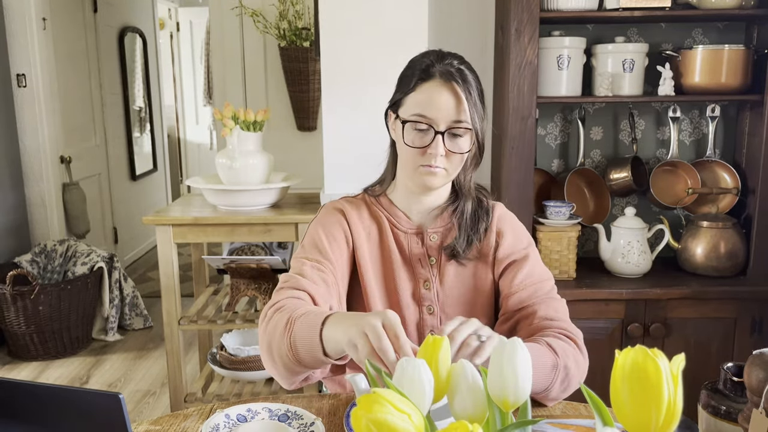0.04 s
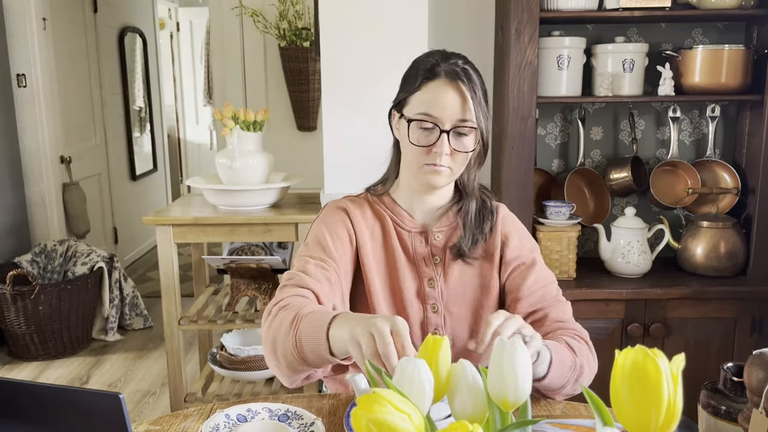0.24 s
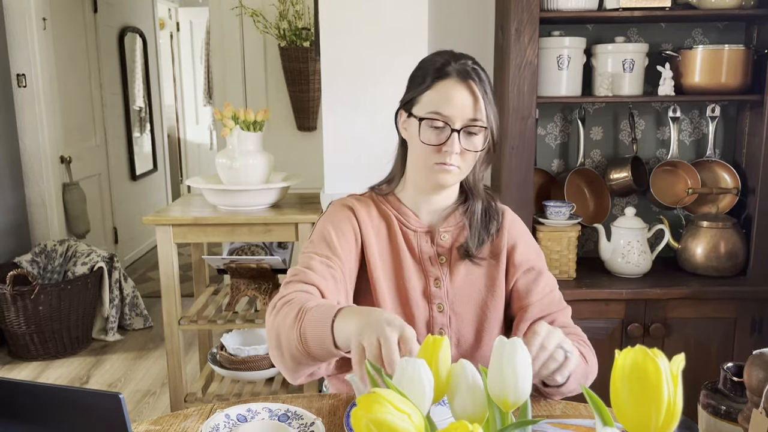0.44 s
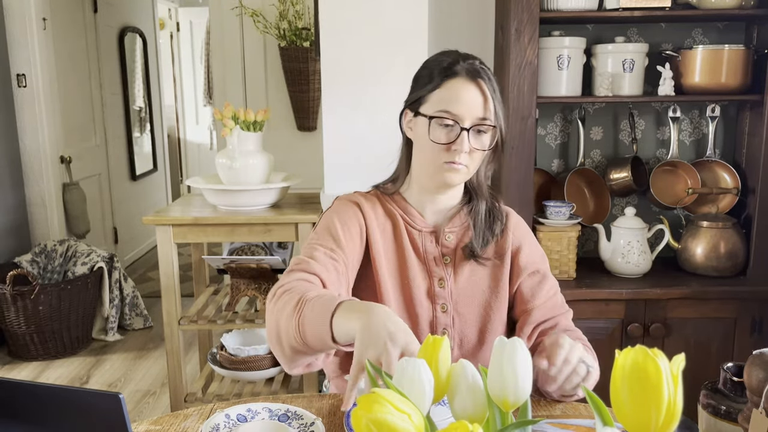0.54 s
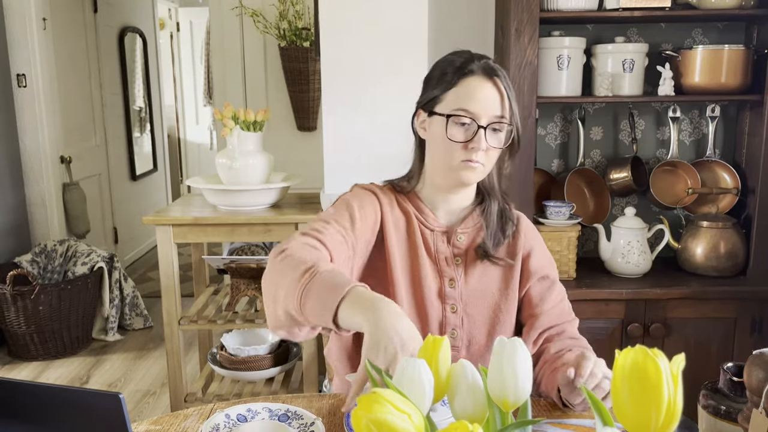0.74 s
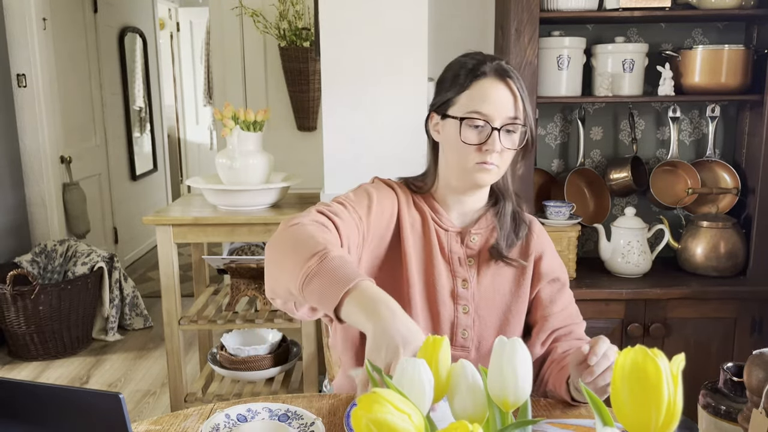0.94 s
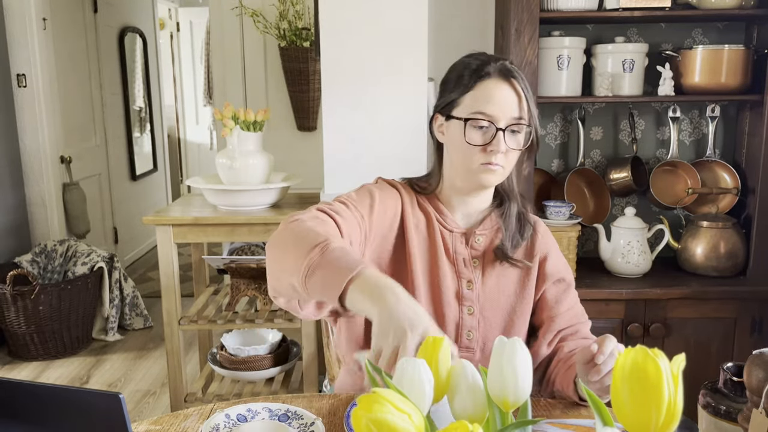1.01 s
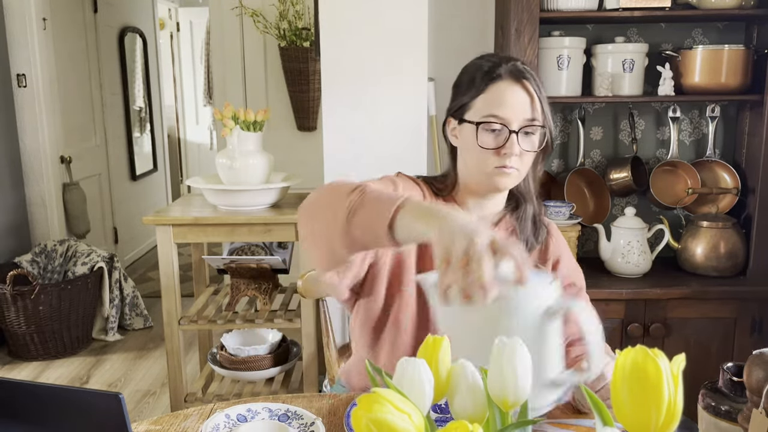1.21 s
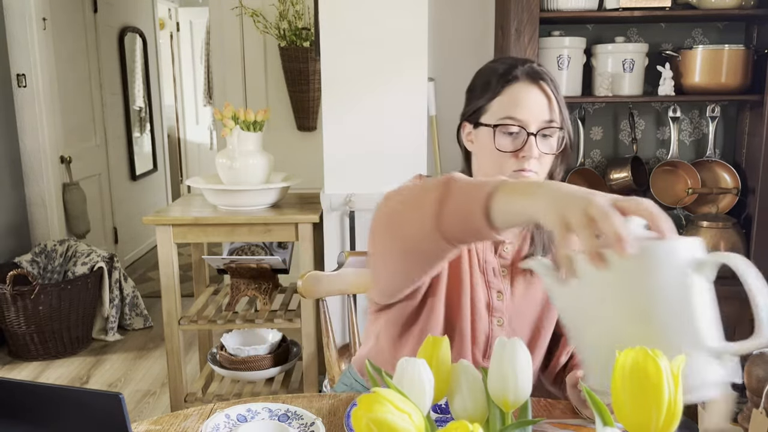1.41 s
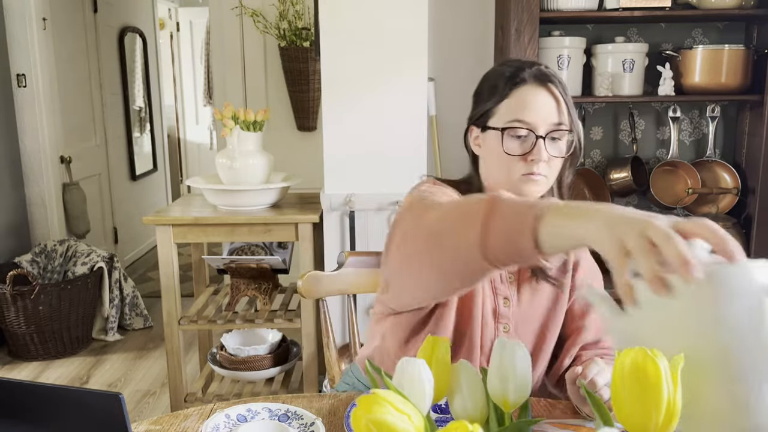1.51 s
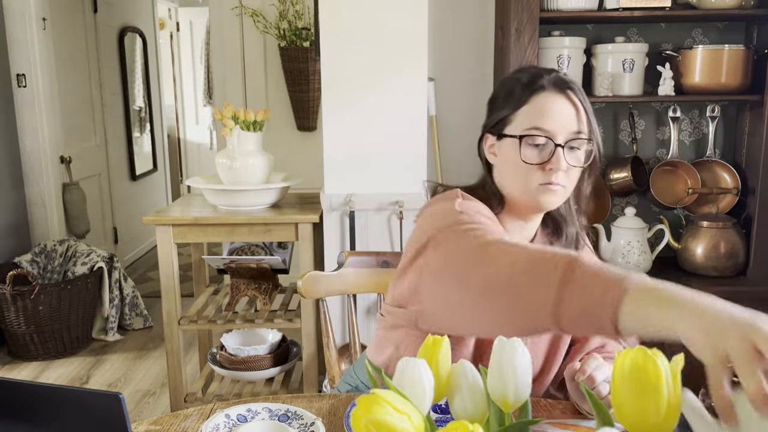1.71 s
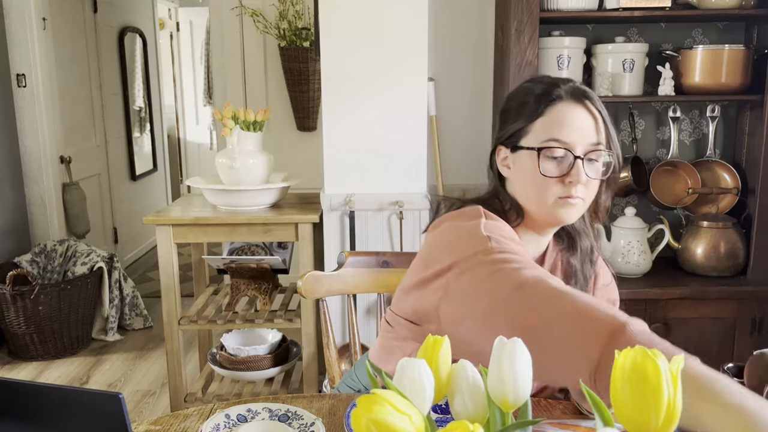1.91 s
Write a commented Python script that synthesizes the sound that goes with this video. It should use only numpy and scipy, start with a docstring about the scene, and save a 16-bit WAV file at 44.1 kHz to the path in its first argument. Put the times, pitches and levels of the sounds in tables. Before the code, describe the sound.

A china lid touches a teapot at about 0.2 seconds, then clinks and rattles into its seat by 0.4, ringing briefly and thumping the wooden table. From 0.7 to 1 second a kettle is picked up with much softer knocks, and a few fainter ones follow until 1.6. A sleeve faintly swishes and an arm lightly bumps the table, up to about 1.9 seconds, in a small quiet room.

```python
"""Teapot lid and kettle

In a small quiet room, a china lid touches a teapot, clinks on the rim and rattles into its seat.
Each contact makes the china ring and thumps the wooden table. Then a kettle is picked up with a few
soft knocks and lifted aside, while a sleeve swishes and an arm bumps the table."""
import sys
import numpy as np
from scipy import signal
from scipy.fft import rfft, irfft
from scipy.io import wavfile

SR = 44100
rng = np.random.default_rng(int(sys.argv[2]) if len(sys.argv) > 2 else 0)


def digitize_waveform(pressure):
    """Quantize a signal to 16-bit integers and store it at the path in sys.argv[1].

    Rows of a 2-D input are taken as channels; values are limited to [-1, 1].
    """
    field = np.atleast_2d(pressure).T
    bounded = np.clip(field, -1, 1)
    quanta = np.round(bounded * 32767).astype(np.int16)
    wavfile.write(sys.argv[1], SR, quanta)


N = 85995
RING_T = np.arange(int(.6 * SR)) / SR  # time since a hit, in seconds

# The lid meets the pot (t/s, then level/dB of pot, rim, lid, crack and table, brightness/Hz, rise/s)
CLINKS = [(0.1777, -22, -46, -54, -27, -50, 2611, .0025),
          (0.2208, -19.5, -21.5, -27, -23, -58, 3000, 0.00045),
          (0.2329, -22, -21.5, -23.5, -23.5, -49.5, 5550, 0.00084),
          (0.3120, -45, -19.5, -20.5, -21.5, -44.5, 7006, .0003),
          (0.3200, -18, -43.5, -24.5, -19, -22, 4000, 0.0012),
          (0.3307, -27, -45, -18, -24.5, -29.5, 6956, .001),
          (0.3579, -27.5, -19.5, -36.5, -33.5, -37.5, 6000, .0006),
          (0.3640, -24.5, -41.5, -12, -20, -38, 14960, 0.00027),
          (0.3705, -31, -26, -24.5, -24, -30, 7996, .001),
          (0.3880, -25, -34.5, -16.5, -24.5, -31.5, 7000, 0.0006)]
# Modes are the tones a struck thing rings with (f/Hz, level/dB, time to fade by 60 dB/s)
POT_MODES = [(334, -6, .2), (385, -9, .07), (505, -9, .14), (570, -11, .06), (982, -8, .38),
             (1199, -12, .3), (1214, -4, .32), (1395, -13, .24), (1740, -16, .1), (2161, -14, .36),
             (2966, -8, .34), (3801, -18, .38), (4357, -14, .32), (4735, -19, .3), (5012, -16, .25)]
RIM_MODES = [(1230, -8, .34), (1830, -13, .2), (2586, -5, .4), (2606, -8, .14), (2790, -13, .16),
             (2940, -18, .3), (3110, -3, .22), (3343, -12, .2), (3800, -11, .36), (4640, -15, .24),
             (4810, -19, .2), (5368, -18, .14)]
LID_MODES = [(1098, -12, .33), (2865, -5.5, .29), (2978, -14, .28), (3133, -3, .23), (3216, -9, .29),
             (3290, -16, .18), (4039, -15, .33), (4527, -21, .25), (4736, -13, .33), (6434, -26, .25),
             (7156, -26, .12), (7520, -21, .16), (7646, -12, .18), (7840, -22, .15)]
TABLE_MODES = [(124, -14.5, .15), (160, -3.5, 0.13), (190.6, -1.5, 0.15), (222.8, 0.5, .17),
               (315, -6.5, 0.056), (423, -5, .07), (505.5, -4, .15), (655, -12.5, 0.3)]
# Strength of the china's many weak high tones (f/Hz, level/dB)
OVERTONES = [(5400, -2.5), (6000, -9), (7700, -6.5), (8800, -11), (10000, -2.5), (11300, 0), (12600, -4),
             (14200, -6.5), (15200, -13.5)]
# Kettle knocks (t/s, ring level/dB, main ring f/Hz, thud level/dB, brightness/Hz)
KNOCKS = [(0.736, -63.5, 1059, -47, 809), (0.878, -48, 1051, -46, 879), (0.892, -61, 1050, -45.5, 1200),
          (0.917, -57.5, 1250, -47.5, 1490), (0.944, -71, 1233, -57, 1500), (0.981, -66, 1260, -50, 804),
          (1.0058, -48.5, 1250, -48, 3660), (1.362, -67.5, 1039, -56.5, 2500), (1.533, -84, 1060, -51, 693),
          (1.634, -74, 900, -56, 1000)]
# The kettle's modes (multiple of the main ring, level/dB, time to fade by 60 dB/s)
KETTLE_MODES = [(1, -2.5, .16), (1.04, -7, .1), (1.35, -4, .11), (1.41, -3, .11), (1.48, -3, .14),
                (1.56, -6, .11), (2.1, -14, .1), (2.3, -12, .12), (2.6, -14, .1), (3.03, -11, .1)]
# The arm bumps the table (t/s, level/dB, f/Hz)
BUMPS = [(0.609, -46.5, 116.4), (0.70, -49.5, 65.11), (0.991, -42, 91), (1.079, -52.5, 109.7),
         (1.538, -51, 119.5), (1.696, -52.5, 121), (1.738, -49.5, 83), (1.765, -57.5, 117.6)]
# How the sleeve's swish and the arm's low rustle swell and fade (t/s, level/dB)
SLEEVE_LEVEL = [(0, -101), (0.12, -79.5), (0.8, -91), (0.95, -75.5), (1.15, -85), (1.25, -80), (1.29, -73),
                (1.33, -76.5), (1.37, -71.5), (1.44, -79), (1.58, -77.5), (1.68, -66), (1.78, -67),
                (1.87, -70), (1.95, -69.5)]
RUSTLE_LEVEL = [(0, -64.5), (0.12, -77), (0.6, -70.5), (0.82, -75.5), (0.95, -59), (1.2, -77), (1.38, -71),
                (1.47, -73.5), (1.6, -65.5), (1.7, -65.5), (1.8, -71.5), (1.95, -74)]
# A spectrum says how strong a noise is from low to high (f/Hz, relative level/dB)
CRACK_SPECTRUM = [(110, -22.5), (190, -7), (330, -3.5), (520, 0), (760, -6), (1150, 3), (1800, -2),
                  (2300, -6), (3000, 5.5), (3600, -5.5), (5000, -1.5), (6000, -15.5), (7700, -12.5),
                  (8800, -25), (11000, -15), (14000, -16), (16000, -35)]  # quickly dying part of a clink
CLACK_SPECTRUM = [(700, -18), (1250, 1), (1450, -8), (1800, -2), (2200, -23), (2800, -12), (3400, -23),
                  (3850, -13), (4600, -33), (9000, -45)]  # dry part of a knock
THUD_SPECTRUM = [(40, -6.5), (100, 6), (230, -2.5), (500, -7), (800, -15), (1800, -28), (4000, -31),
                 (9000, -38)]  # dull part of a knock
SLEEVE_SPECTRUM = [(530, -24), (900, 1.5), (1240, -14), (1750, -2.5), (3630, -4.5), (4180, -2), (7320, -14),
                   (8340, -34), (9180, -21), (13100, -14), (15500, -26)]
RUSTLE_SPECTRUM = [(60, -17), (130, 2), (300, 0), (600, -7.5), (1000, -14), (2000, -25), (5000, -44)]
HUSH_SPECTRUM = [(12, -33.5), (20, -3.5), (80, 7), (259, -19), (491, -27.5), (581, -40.5), (811, -27),
                 (1630, -39), (2210, -34), (3450, -47.5), (4430, -36), (7730, -44.5), (12400, -39.5),
                 (15500, -61)]  # the quiet room
# How long the room echoes (f/Hz, time to fade by 60 dB/s)
ROOM_FADE = [(100, .55), (320, .38), (900, .36), (2500, .31), (6000, .25), (13000, .23)]
# How alike left and right are (f/Hz, likeness: 1 is the same, 0 is unrelated)
LIKENESS = [(50, .96), (220, 0.9), (500, .4), (1200, .4), (2800, .7), (5000, .3), (8000, -.3), (13000, 0.4)]
# How much louder the teapot is on the left (f/Hz, left minus right level/dB)
TEAPOT_LEAN = [(100, -0.3), (300, 0), (1200, 1), (3100, 2.2), (3800, 5), (4500, 10), (5400, 5.5),
               (7000, 0.5), (14000, .3)]
# How far a tone is out of step between left and right (f/Hz, phase/rad)
PHASE_GAP = [(100, 0.12), (330, 0.75), (520, 0.94), (1200, 1.5), (2900, 1), (4500, 0.7), (7600, 2.0),
             (12000, 1.5)]


def teapot():
    """Each contact rings pot, rim and lid, gives a short crack of noise and thumps the table."""
    seated_s, damping_db_per_s = 0.37, 45
    rings, cracks, thumps = np.zeros((3, 2, N))
    shimmer = overtones(count=44)
    shimmer_hz = np.mean([hz for hz, db in OVERTONES])
    thump = ring(TABLE_MODES, bright_hz=np.inf, rise_s=.003)
    for s, pot_db, rim_db, lid_db, crack_db, table_db, bright_hz, rise_s in CLINKS:
        for modes, db in (POT_MODES, pot_db), (RIM_MODES, rim_db), (LID_MODES, lid_db):
            add(rings, s, amp(db) * ring(modes, bright_hz, rise_s))
        shimmer_gain = amp(crack_db - 18.5) * contact(shimmer_hz, bright_hz)
        add(rings, s, shimmer_gain * dying(fade_s=.14, rise_s=rise_s) * shimmer)
        crack = noise(CRACK_SPECTRUM, len(RING_T), bright_hz)
        add(cracks, s, amp(crack_db) * dying(fade_s=.07, rise_s=rise_s) * crack)
        add(thumps, s, amp(table_db) * thump)
    # Once the lid is seated, a hand on the china damps the ringing.
    rings *= amp(-damping_db_per_s * np.maximum(np.arange(N) / SR - seated_s, 0))
    sound = room(rings + thumps, echo_db=-13.5) + room(cracks, echo_db=1.5)
    bass_cut = signal.butter(4, 110, "highpass", fs=SR, output="sos")
    sound = signal.sosfilt(bass_cut, sound)
    lean_db = read(TEAPOT_LEAN, np.fft.rfftfreq(2 * N, 1 / SR))
    return irfft(rfft(sound, 2 * N) * amp([lean_db / 2, -lean_db / 2]))[:, :N]


def overtones(count):
    """The china's shimmer: a cluster of high tones at random pitches."""
    lowest, highest = OVERTONES[0][0], OVERTONES[-1][0]
    pitches = lowest + (highest - lowest) * (np.arange(count) + rng.random(count)) / count
    return sum(amp(read(OVERTONES, hz)) * np.sin(2 * np.pi * (hz * RING_T + rng.random((2, 1))))
               for hz in pitches)


def kettle():
    """Soft knocks as the kettle is gripped and lifted: a short ring and clack over a dull thud."""
    out = np.zeros((2, N))
    for s, ring_db, main_hz, thud_db, bright_hz in KNOCKS:
        modes = [(main_hz * multiple, db, fade_s) for multiple, db, fade_s in KETTLE_MODES]
        add(out, s, amp(ring_db) * ring(modes, bright_hz, rise_s=.00092))
        clack = dying(fade_s=.092, rise_s=.0008) * noise(CLACK_SPECTRUM, len(RING_T), bright_hz)
        add(out, s, amp(ring_db - 2.5) * clack)
        thud = dying(fade_s=.12, rise_s=.002) * noise(THUD_SPECTRUM, len(RING_T), bright_hz)
        add(out, s, amp(thud_db) * thud)
    return room(out, echo_db=-5.5)


def arm():
    """The sleeve rubs and rustles as the arm moves, and the arm softly bumps the table."""
    swish = level(SLEEVE_LEVEL) * noise(SLEEVE_SPECTRUM, N)
    rustle = level(RUSTLE_LEVEL) * noise(RUSTLE_SPECTRUM, N)
    out = swish + rustle
    for s, db, hz in BUMPS:
        add(out, s, amp(db) * dying(fade_s=.21, rise_s=.0047) * np.sin(2 * np.pi * hz * RING_T))
    return out


def room(sound, echo_db):
    """Adds the room's echo: scattered reflections whose treble fades sooner than their bass."""
    echoes_per_s, delay_s = 3000, .0041
    shape = (2, len(RING_T))
    echoes = rng.choice([-1., 1.], shape) * (rng.random(shape) < echoes_per_s / SR) * (RING_T > delay_s)
    hz, t, (left, other) = signal.stft(echoes, SR, nperseg=256)
    bands = stereo(left, other, hz[:, None])
    fade = np.exp(-np.log(1000) * t / read(ROOM_FADE, hz)[:, None])
    tail = signal.istft(bands * fade, SR, nperseg=256)[1]
    tail /= np.linalg.norm(tail[0])
    return sound + amp(echo_db) * signal.fftconvolve(sound, tail, axes=1)[:, :N]


def hush():
    """The faint, steady, low noise of the room."""
    return amp(-62.5) * noise(HUSH_SPECTRUM, N)


def ring(modes, bright_hz, rise_s):
    """A struck thing rings: each tone fades at its own speed, out of step between left and right."""
    out = np.zeros((2, len(RING_T)), complex)
    for hz, db, fade_s in modes:
        phase_shift = np.exp(1j * read(PHASE_GAP, hz) * np.array([[-.5], [.5]]))
        tone = np.exp((2j * np.pi * hz - np.log(1000) / fade_s) * RING_T)
        out += amp(db) * contact(hz, bright_hz) * phase_shift * tone
    return out.imag * dying(np.inf, rise_s)


def contact(hz, bright_hz):
    """A softer hit sounds duller: tones above bright_hz come out weaker."""
    return 1 / np.sqrt(1 + (hz / bright_hz) ** 3)


def dying(fade_s, rise_s):
    """The loudness of a hit: a quick rise, and a fall of 60 dB every fade_s seconds."""
    return (1 - np.exp(-RING_T / rise_s)) * np.exp(-np.log(1000) * RING_T / fade_s)


def noise(spectrum, size, bright_hz=np.inf):
    """Stereo noise shaped by a spectrum and dulled above bright_hz."""
    hz = np.fft.rfftfreq(size, 1 / SR)
    left, other = rfft(rng.standard_normal((2, size)))
    gain = amp(read(spectrum, hz))
    gain = gain / np.sqrt(np.mean(gain ** 2)) * contact(hz, bright_hz)
    return irfft(stereo(left, other, hz) * gain, size)


def stereo(left, other, hz):
    """Blends two unrelated noises so that left and right are partly alike."""
    same = np.clip(read(LIKENESS, hz), -1, 1)
    return np.array([left, same * left + np.sqrt(1 - same ** 2) * other])


def amp(db):
    """Turns decibels into a gain to multiply by."""
    return 10 ** (np.asarray(db) / 20)


def read(points, hz):
    """Looks up a frequency in a table, sliding between rows on a pitch (log) scale."""
    f, value = np.transpose(points)
    return np.interp(np.log(hz + 1), np.log(f + 1), value)


def level(points):
    """Turns a (t/s, level/dB) curve into a gain for every sample."""
    return amp(np.interp(np.arange(N) / SR, *np.transpose(points)))


def add(mix, s, sound):
    """Mixes a sound in, starting at s seconds."""
    part = mix[:, round(s * SR):][:, :sound.shape[-1]]
    part += sound[..., :part.shape[1]]


def scene():
    """The teapot over the quieter kettle, arm and room, which sit a little to the left."""
    quiet = kettle() + arm() + hush()
    return teapot() + quiet * amp([[.6], [-.6]])


def record(dry):
    """Cuts away the very highest treble."""
    cutoff_hz = 15700
    treble_cut = signal.firwin(511, cutoff_hz, window=("kaiser", 9), fs=SR)
    return signal.oaconvolve(dry, treble_cut[None], "same")


dry = scene()
out = record(dry)
digitize_waveform(out)
```